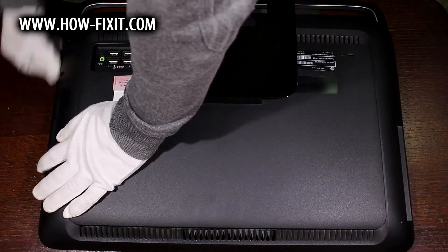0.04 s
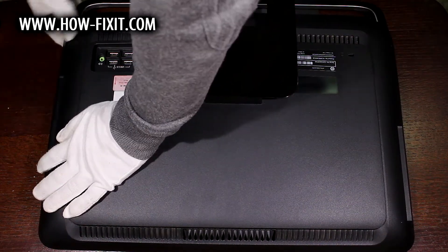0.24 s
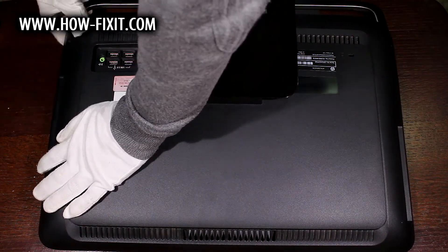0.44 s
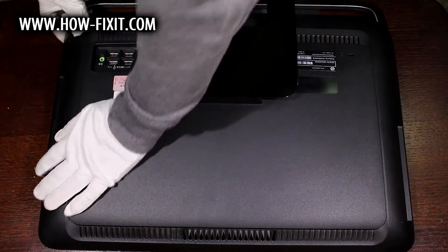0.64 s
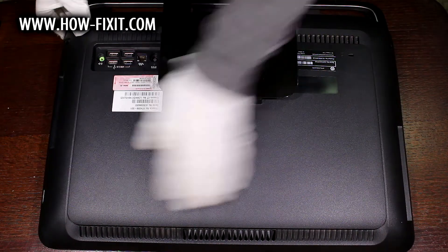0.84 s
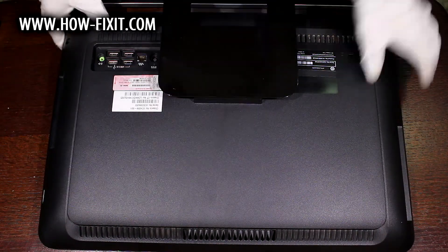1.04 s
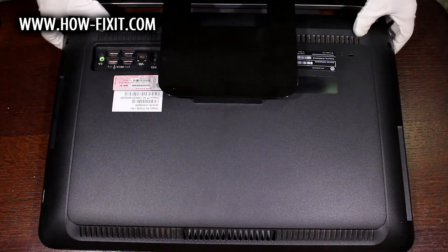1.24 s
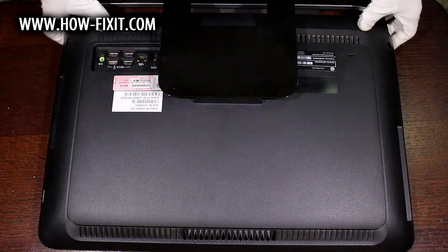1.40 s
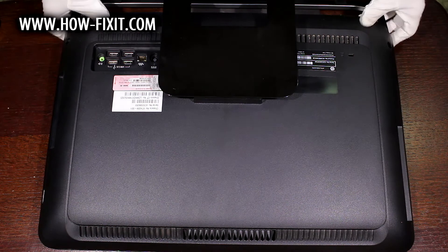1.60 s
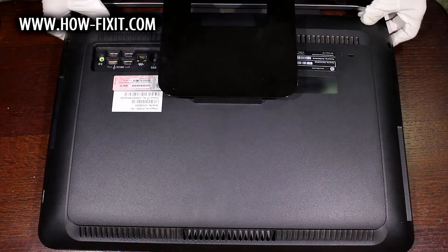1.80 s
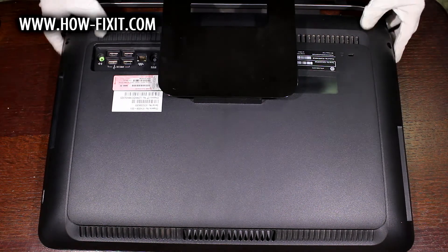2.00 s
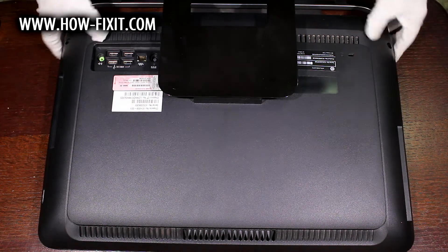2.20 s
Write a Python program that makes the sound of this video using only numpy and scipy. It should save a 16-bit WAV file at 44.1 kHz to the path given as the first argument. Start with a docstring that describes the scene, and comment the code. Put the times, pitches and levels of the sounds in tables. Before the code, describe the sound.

Cotton gloves rub in short, thin strokes on a plastic computer casing, left and right of the microphone, with light fingertip taps and ticks. One sharp click comes just past halfway, over the soft hiss of a quiet room.

```python
"""Over the soft hiss of a quiet room come short, thin rubs: two cotton-gloved hands, one left, one right,
shift their grip on the plastic casing of a computer lying on a table. Stick-slip friction of the cloth
drives the shell, fingertip bumps set it ringing, and the rim ticks and gives one sharp click.
Light plastic radiates low frequencies poorly, so there is almost no bass."""
import sys
import numpy as np
from scipy import signal
from scipy.fft import rfft, irfft
from scipy.io import wavfile

SR = 44100
rng = np.random.default_rng(int(sys.argv[2]) if len(sys.argv) > 2 else 0)


def generate_wav(sig):
    """Save sig (samples, or channels by samples) to the path in sys.argv[1] as 16-bit PCM at SR."""
    pcm = np.round(np.clip(np.atleast_2d(sig).T, -1, 1) * 32767).astype(np.int16)
    wavfile.write(sys.argv[1], SR, pcm)


N = 103635
T = np.arange(N) / SR

# Room noise. Each row: frequency in Hz, relative spectral density in dB.
ROOM_SPECTRUM = [(25, -47), (60, -39), (150, -39), (280, -32), (420, -28), (560, -22), (700, -13.5),
                 (880, -2), (1100, 1), (1350, -2.5), (1700, -7.5), (2300, -13.5), (3000, -18.5),
                 (3900, -23), (4800, -36.5), (16000, -52.5)]
# Microphone hiss. Each row: frequency in Hz, relative spectral density in dB.
HISS_SPECTRUM = [(100, -15), (2000, -4.5), (4800, -3), (7500, -0.5), (10500, -1), (13000, -3),
                 (16000, -4.5)]
# Electrical whine. Each row: frequency in Hz, level in dB.
WHINE_TONES = [(11025, -74), (14700, -75.5)]
# Hollow note of the casing. One row: start, rise and decay constant in seconds, level in dB,
# pitch in Hz, left minus right in dB.
HOLLOW_NOTE = (0.646, .014, .010, -48, 405, -8)
# Rim clicks. Each row: start in seconds, level in dB, tilt in dB per octave, left minus right in dB.
RIM_CLICKS = [(0.2595, -15.5, -3, 12), (0.3958, -22, 0, -15), (0.443, -32, 10, -11), (1.317, -6, -6.5, -21),
              (1.3202, -17.5, -1, -13.5), (1.3362, -24, 11.5, -18.5), (1.6590, -25, 1, -16.5),
              (1.832, -30, 12, -14)]
# Modes of the rim. Each row: frequency in Hz, relative level in dB, seconds to decay by 60 dB.
RIM_MODES = [(1200, -12, .016), (1767, -4.5, .012), (2230, 9.5, 0.0063), (3365, -8, 0.015),
             (3890, -6.5, 0.015), (5180, -11.5, 0.0052), (8000, -15.5, .004)]
# Noise burst of a click. Each row: frequency in Hz, relative level in dB.
CRACK_SPECTRUM = [(300, -39.5), (800, -13.5), (1400, 2), (2200, -1), (3000, -8), (4000, 9), (5000, -26),
                  (8000, -14), (12000, -28.5), (16000, -36)]
# Fingertip bumps. Each row: start in seconds, level in dB, pitch in Hz, rise and decay constant
# in seconds, relative overtone level in dB, left minus right in dB.
FINGER_BUMPS = [ (0.2577, -13, 1417, 0.0012, 0.0029, -12.5, 11),
                (0.3953, -11, 1610, 0.00056, 0.00099, -35, -15),
                (0.8724, -10, 1370, 0.0012, 0.00062, -44, 24),
                (1.1085, -22, 1720, 0.0014, 0.0018, -18, -17), (1.2043, -8.5, 1000, 0.00048, .0021, -9, 20),
                (1.5232, -9, 1032, 0.0021, .0070, -42, 23),
                (1.8535, -23.5, 2253, 0.0019, 0.0045, -33.5, 22),
                (1.92, -18, 1315, .0030, 0.012, -29.5, -13), (2.016, -26, 1565, 0.0028, 0.0028, -18, 19),
                (2.1105, -20, 984, 0.0056, 0.0088, -25.5, -16)]
# Response of the shell to a slip. Each row: frequency in Hz, relative gain in dB.
SHELL_RESPONSE = [(100, -59.5), (300, -45), (420, -48.5), (550, -29), (700, -12.5), (900, -3), (1150, 4.5),
                  (1450, 2), (1800, -3), (2300, -7), (2900, -15), (3900, -22), (4800, -42.5), (8000, -48),
                  (16000, -61.5)]
# Fizz of the weave. Each row: frequency in Hz, relative level in dB.
CLOTH_SPECTRUM = [(1000, -24), (4000, -13), (6000, 0.5), (8000, 7), (11000, -5.5), (16000, -12.5)]
# Glove rubs. Each row: start, rise and decay constant in seconds, level in dB, resonance of the touched
# spot in Hz, tilt in dB per octave, relative fizz level in dB, left minus right in dB.
GLOVE_RUBS = [ (0.167, 0.016, 0.0076, -35.5, 1210, 6.5, -15, 3),
              (0.246, 0.0088, .012, -18.5, 1340, -6, -38, -27),
              (0.258, 0.0025, 0.032, -17, 1320, -1.5, -38, 15.5),
              (0.331, 0.0095, 0.036, -23.5, 1090, 3.5, -36, -17),
              (0.424, 0.017, .036, -31, 2840, 2.5, -19, -11),
              (0.470, 0.0091, 0.027, -29.5, 1280, -7, -35, 12),
              (0.588, 0.0087, 0.0092, -22.5, 1100, -2, -31, 14),
              (0.584, 0.0072, 0.11, -29.5, 1210, 0.5, -29, -25),
              (0.630, 0.039, 0.078, -26.5, 1140, -5.5, -42, -34),
              (0.648, 0.0083, 0.025, -16, 1560, 2, -44, 23), (0.689, 0.057, 0.09, -28.5, 1110, 0, -37, 7),
              (0.725, 0.013, 0.029, -23, 1200, 1.5, -37, -31),
              (0.782, 0.0053, 0.012, -21, 1200, 7.5, -22, -17),
              (1.056, 0.0065, 0.032, -27.5, 1250, 5, -25, -25),
              (1.255, 0.014, 0.049, -32, 2050, -1, -29, -28), (1.405, 0.019, 0.054, -44, 3300, 10, -23, -9),
              (1.535, 0.013, 0.035, -30.5, 1370, 4, -32, -30),
              (1.581, 0.0016, 0.019, -25, 3880, 7.5, -24.5, -18),
              (1.601, 0.0057, 0.047, -24, 1020, 3.5, -39, -19),
              (1.713, 0.015, 0.025, -23.5, 1310, -5, -42, -20),
              (1.784, 0.012, 0.027, -27, 1280, 0.5, -32, 12.5),
              (1.828, 0.0022, 0.014, -24, 1220, -2.5, -26, -20),
              (1.851, 0.0029, 0.1, -27, 2040, 0, -39, 16), (1.875, 0.017, 0.027, -28.5, 1420, 0, -34, -15),
              (1.913, 0.01, 0.063, -27.5, 1430, 0.5, -29, -29),
              (2.007, 0.01, 0.055, -23, 1570, -1, -33.5, 25),
              (2.105, 0.0076, 0.035, -26, 945, -2.5, -28, -20),
              (2.139, 0.018, 0.023, -27.5, 1370, -3, -32, 33)]

TILT_PIVOT_HZ = 1330


def undb(db):
    """Amplitude grows tenfold for every 20 dB."""
    return 10 ** (np.asarray(db) / 20)


def unit(x):
    """Normalisation to an rms of 1."""
    return x / np.sqrt(np.mean(x ** 2))


def colour(x, points, tilt_db=0, spot_hz=1000, spot_db=0):
    """Minimum-phase filtering by a spectrum, a tilt per octave and one resonance; the result has rms 1."""
    size, spot_octaves = 2048, 0.38
    hz, db = np.array(points, float).T
    octave = np.log2(np.maximum(np.arange(size // 2 + 1) * SR / size, 1))
    curve_db = np.interp(octave, np.log2(hz), db)
    curve_db += tilt_db * np.clip(octave - np.log2(TILT_PIVOT_HZ), -1, 2)
    curve_db += spot_db / (1 + ((octave - np.log2(spot_hz)) / spot_octaves) ** 2)
    cepstrum = irfft(np.log(undb(curve_db)))
    cepstrum[1:size // 2] *= 2  # folding the cepstrum makes the filter causal
    cepstrum[size // 2 + 1:] = 0
    impulse_response = irfft(np.exp(rfft(cepstrum)))
    return unit(signal.fftconvolve(x, impulse_response)[:len(x)])


def place(x, pan_db):
    """A level difference between left and right gives direction, at constant total power."""
    gains = undb(np.array([[pan_db], [-pan_db]]) / 2)
    return x * gains / np.sqrt(np.sum(gains ** 2))


def swell(start, rise, decay):
    """Envelope of a damped vibration: a smooth rise, then exponential decay."""
    age = T - start
    attack = np.sin(np.pi / 2 * np.clip(age / rise, 0, 1))
    return attack * np.exp(-np.maximum(age - rise, 0) / decay)


def waver(points_per_s):
    """Linear interpolation between random points gives a slow fluctuation of rms 1."""
    points = rng.standard_normal(N // 100)
    return unit(np.interp(T * points_per_s, np.arange(len(points)), points))


def radiate(x, cutoff_hz):
    """Radiation efficiency: light plastic gives off hardly any sound below a cutoff."""
    return signal.sosfilt(signal.butter(5, cutoff_hz, btype="high", fs=SR, output="sos"), x)


def background(coherence=0.26):
    """Noise floor: wavering, partly coherent room noise, even microphone hiss and a faint whine."""
    common = np.sqrt(coherence) * rng.standard_normal(N)
    room = np.zeros((2, N))
    for side in range(2):
        noise = common + np.sqrt(1 - coherence) * rng.standard_normal(N)
        room[side] = colour(noise, ROOM_SPECTRUM) * undb(1.07 * waver(points_per_s=35))
    hiss = np.array([colour(rng.standard_normal(N), HISS_SPECTRUM) for _ in range(2)])
    whine = sum(undb(db) * np.sqrt(2) * np.sin(2 * np.pi * hz * T) for hz, db in WHINE_TONES)
    return undb(-39.5) * room + undb(-51) * hiss + whine


def reflections(x, t60_s=0.09, delay_s=0.0027, level_db=-11.5):
    """Reverberation: table and walls return a short, weak tail, mostly on the side of the source."""
    age = T[:N // 8]
    envelope = np.exp(-np.log(1000) * age / t60_s) * (age > delay_s)
    tail = rng.standard_normal((2, len(age))) * envelope
    tail /= np.sqrt(np.sum(tail ** 2, axis=1, keepdims=True))
    return undb(level_db) * signal.fftconvolve(x, tail, axes=1)[:, :N]


def casing_note():
    """Resonance: the casing gives a faint hollow note as the leaning hand lifts off."""
    start, rise, decay, db, hz, pan_db = HOLLOW_NOTE
    return place(undb(db) * swell(start, rise, decay) * np.sin(2 * np.pi * hz * T), pan_db)


def rim_clicks(crack_db=-14.5):
    """Impulses excite a crack and the rim's damped modes: light ticks, and one snap with two rebounds."""
    out = np.zeros((2, N))
    for start, db, tilt_db, pan_db in RIM_CLICKS:
        age = np.maximum(T - start, 0)
        ring = np.zeros(N)
        for hz, mode_db, t60 in RIM_MODES:
            gain = undb(mode_db + tilt_db * np.log2(hz / TILT_PIVOT_HZ))
            ring += gain * np.sin(2 * np.pi * hz * age) * np.exp(-np.log(1000) * age / t60)
        noise = colour(rng.standard_normal(N), CRACK_SPECTRUM, tilt_db)
        crack = undb(crack_db) * swell(start, rise=0.0003, decay=0.0028) * noise
        out += place(undb(db) * (ring / np.abs(ring).max() + crack), pan_db)
    return radiate(out, cutoff_hz=920)


def fingertip_bumps(overtone_ratio=1.91):
    """Free vibration: bumped by a padded finger, the shell rings briefly at the pitch of that spot."""
    out = np.zeros((2, N))
    for start, db, hz, rise, decay, overtone_db, pan_db in FINGER_BUMPS:
        phase = 2 * np.pi * hz * (T - start)
        tone = np.sin(phase) + undb(overtone_db) * np.sin(overtone_ratio * phase)
        out += place(undb(db) * swell(start, rise, decay) * tone, pan_db)
    return radiate(out, cutoff_hz=673)


def stick_slip(slips_per_s=2600, spread_db=2.5):
    """Stick-slip friction: cloth catches and lets go in tiny, uneven jerks over a smooth drag."""
    jerks = (rng.random(N) < slips_per_s / SR) * np.sign(rng.standard_normal(N))
    sizes = undb(spread_db * np.minimum(rng.exponential(size=N), 4))
    drag = 0.31 * rng.standard_normal(N)
    return unit(jerks * sizes) + drag


def glove_rubs():
    """Forced vibration: each rub's friction shakes the shell at its own spot, and the weave adds fizz."""
    out = np.zeros((2, N))
    for start, rise, decay, db, spot_hz, tilt_db, fizz_db, pan_db in GLOVE_RUBS:
        friction = stick_slip()
        # A higher tilt stands for a faster, brighter slide.
        shell = colour(friction, SHELL_RESPONSE, tilt_db, spot_hz, spot_db=5.5)
        fizz = undb(fizz_db) * colour(friction, CLOTH_SPECTRUM)
        out += place(undb(db) * swell(start, rise, decay) * (shell + fizz), pan_db)
    return radiate(out, cutoff_hz=407)


def scene():
    """Superposition: the sounds of the hands add to their reflections, the hollow note and the noise."""
    hands = glove_rubs() + fingertip_bumps() + rim_clicks()
    return hands + reflections(hands) + casing_note() + background()


def record(dry, silent_from_s=2.199, fade_s=0.0051, cutoff_hz=15950):
    """Gating and band limiting: a quick fade to silence, then a steep low-pass on the highest treble."""
    fade = np.sin(np.pi / 2 * np.clip((silent_from_s - T) / fade_s, 0, 1)) ** 2
    lowpass = signal.ellip(10, 0.2, 80, cutoff_hz, fs=SR, output="sos")
    return signal.sosfilt(lowpass, dry * fade)


dry = scene()
out = record(dry)
generate_wav(out)
```